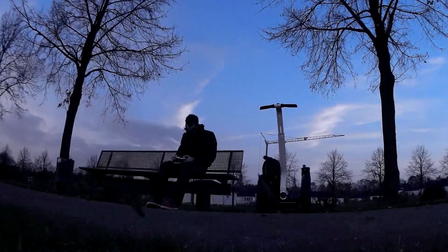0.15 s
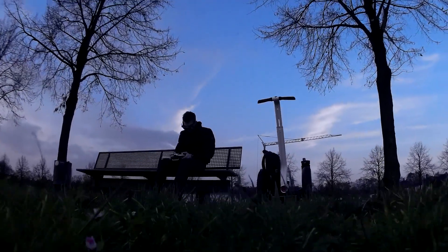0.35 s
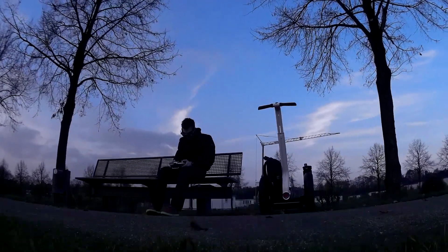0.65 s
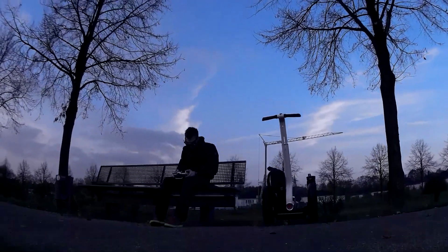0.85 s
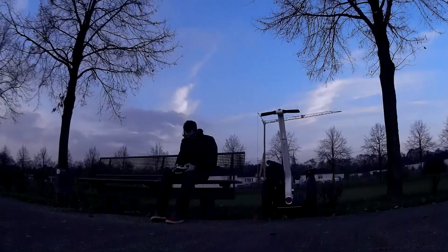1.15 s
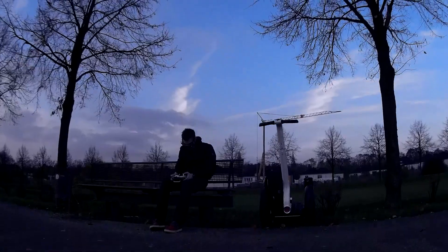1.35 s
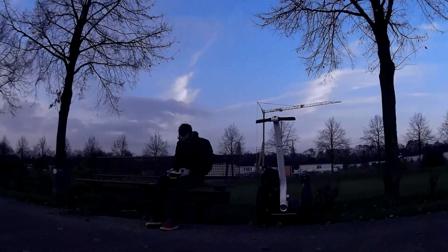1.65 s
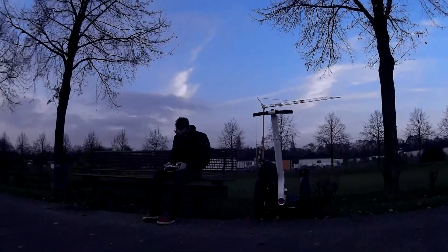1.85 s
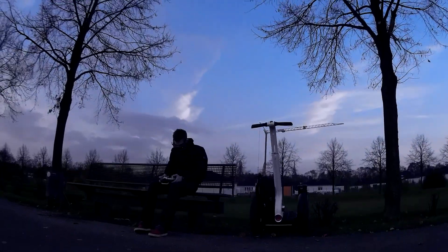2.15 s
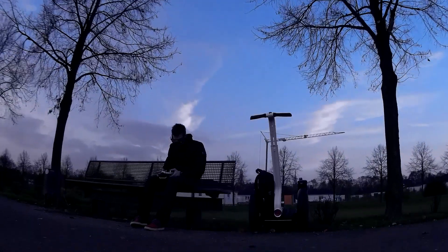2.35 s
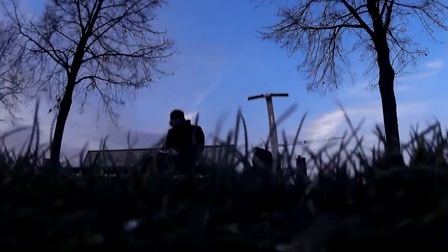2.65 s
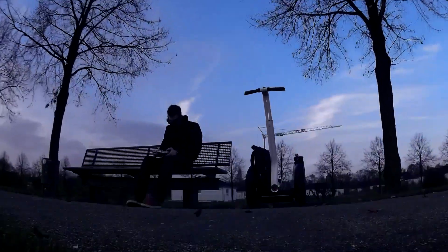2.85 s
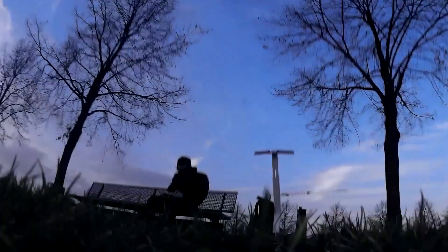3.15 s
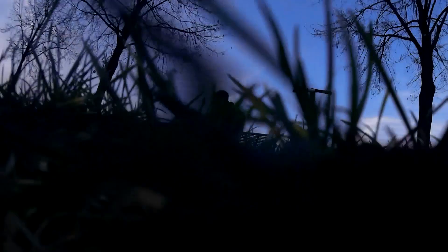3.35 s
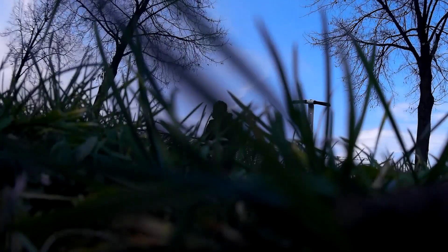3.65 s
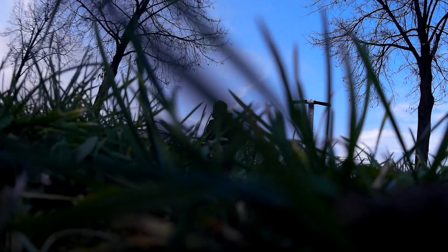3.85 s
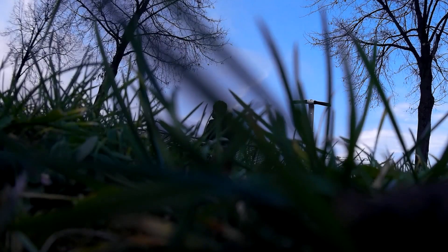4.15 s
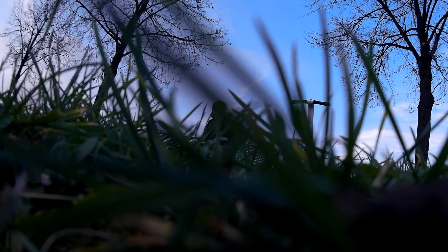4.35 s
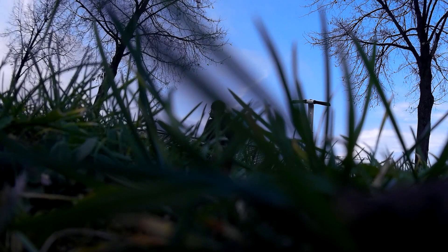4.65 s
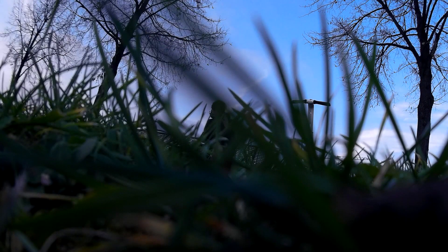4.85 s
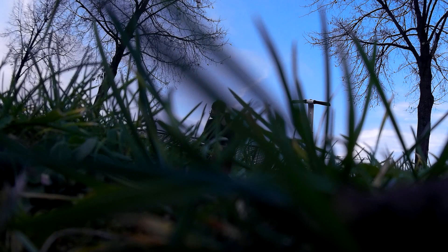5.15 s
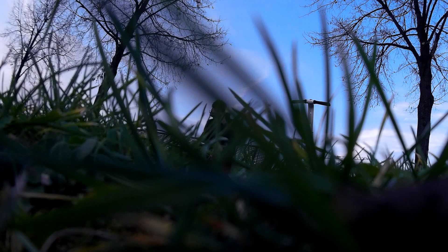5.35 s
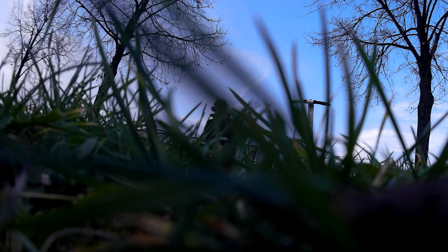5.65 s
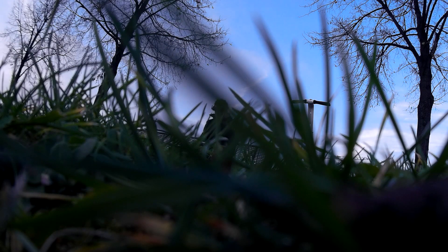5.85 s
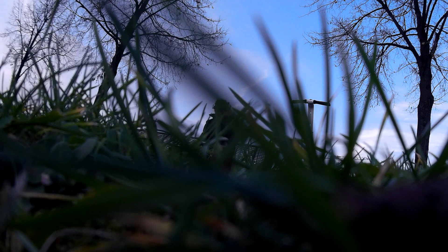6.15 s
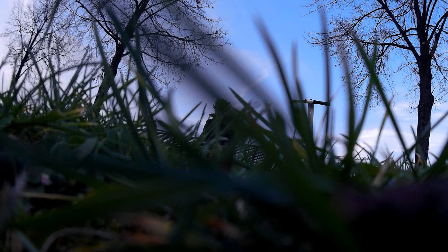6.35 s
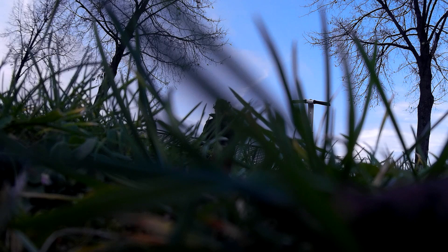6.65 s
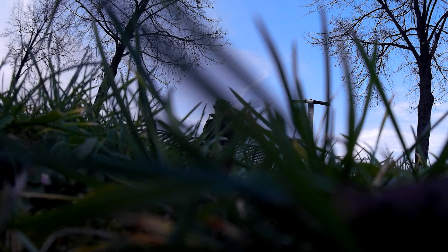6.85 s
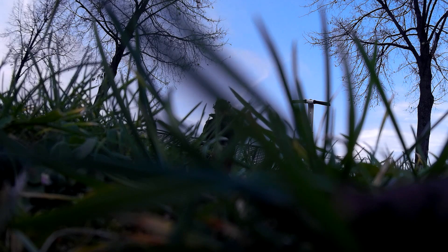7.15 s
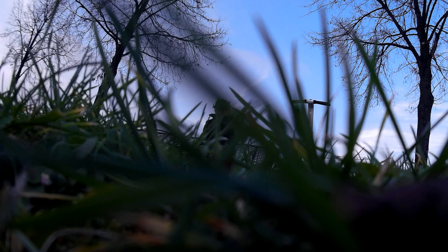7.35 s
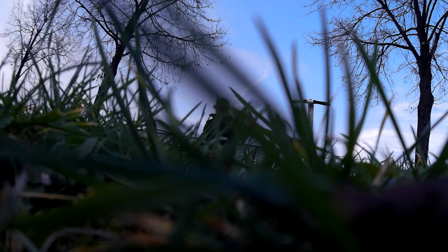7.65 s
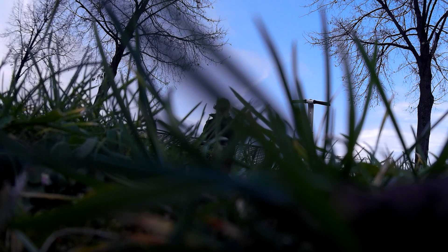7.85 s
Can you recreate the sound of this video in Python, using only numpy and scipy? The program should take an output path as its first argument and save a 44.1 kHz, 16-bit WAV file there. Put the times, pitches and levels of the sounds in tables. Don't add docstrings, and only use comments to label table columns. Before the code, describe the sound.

A small four-rotor drone is heard from a dull, enclosed microphone on its own body, outdoors in a park. From 0 to 2.7 seconds the propellers buzz very loudly, detuned mid-low tones beating and wavering in pitch, with roaring, hissing wash and low wind buffeting, strongest around 0.3 to 0.6. At about 2.7 it bumps the ground with a thud and gust, overloading; by 3.0 the rotors collapse in pitch and a thin whine glides down. At 3.2 it tumbles into grass with a hard gritty crunch. Until 4.3 idling blades slap stalks in rapid irregular cracks and woody knocks, with swishing and rattling. From 4.3 the last motor whine falls quickly, with sparse weak taps, stopping by 4.8. Then to 8 seconds only very faint far traffic rumble remains, with barely audible short electronic whines about once a second.

```python
import sys
import numpy as np
from scipy import signal
from scipy.fft import rfft, irfft, next_fast_len
from scipy.io import wavfile
from scipy.ndimage import uniform_filter1d, map_coordinates

SR = 44100
rng = np.random.default_rng(int(sys.argv[2]) if len(sys.argv) > 2 else 0)


def master_out(mix):
    frames = np.transpose(np.atleast_2d(mix))
    ceiling = np.clip(frames, -1, 1)
    pcm = np.round(ceiling * 32767).astype(np.int16)
    wavfile.write(sys.argv[1], SR, pcm)


def ratio(d):
    e = np.asarray(d, float) / 20
    return 10 ** e


N = 353241
T = np.arange(N) / SR

# (f/Hz, width/Hz, level/dB)
FRAME_MODES = [(906, 36, -1.5), (1140, 64, 0.5), (1372, 43, -1.5)]
# (f/Hz, width/Hz, level/dB)
SHELL_MODES = [(4450, 320, 8.5), (5800, 400, 3), (7900, 500, 6), (9900, 600, 8), (13900, 700, 5)]


def unit(x):
    return x / np.sqrt(np.mean(x ** 2) + 1e-20)


def along(points, f_hz):
    f, v = np.transpose(points)
    return np.interp(np.log(f_hz + 1), np.log(f + 1), v)


def curves(rows):
    t_s, *columns = np.transpose(rows)
    gate = np.interp(T, [t_s[0] - .012, t_s[0], t_s[-1], t_s[-1] + .012], [0, 1, 1, 0])
    return [gate] + [np.interp(T, t_s, c) for c in columns]


def wobble(rate_hz):
    return map_coordinates(rng.standard_normal(int(N * rate_hz / SR) + 4), [T * rate_hz])


def filtered(x, gain):
    m = next_fast_len(N + 8192)
    return irfft(rfft(x, m) * gain(np.fft.rfftfreq(m, 1 / SR)), m)[:N]


def humps(modes, f_hz):
    return sum(ratio(2 * db) / (1 + (2 * (f_hz - c) / w) ** 2) for c, w, db in modes)


def noise(spectrum, drive=1, modes=(), lift_db=0):
    def gain(f):
        return ratio(along(spectrum, f)) * np.sqrt(1 + ratio(2 * lift_db) * humps(modes, f))
    return unit(filtered(drive * rng.standard_normal(N), gain))


def phase(f_hz, jitter):
    return 2 * np.pi * np.cumsum(f_hz * (1 + jitter * wobble(40))) / SR + rng.uniform(0, 2 * np.pi)


def tone(rows, jitter, flutter_db):
    gate, f_hz, level_db = curves(rows)
    level = ratio(level_db + flutter_db * wobble(35).clip(None, .4))
    return np.sqrt(2) * gate * level * np.sin(phase(f_hz, jitter))


def rotor(rows, orders, weak, hunt=.002):
    # (f/Hz, width/Hz, level/dB)
    duct_modes = [(1210, 110, 10), (1740, 90, 4)]
    # (t/s, level/dB)
    guard_rows = [(0, 2), (.11, 2), (.17, -7), (.75, -7), (.88, 1), (.98, 2.5), (1.05, -2), (1.7, -3),
                  (1.95, -7), (2.04, 0), (2.6, 0), (2.68, -7)]
    gate, f_hz, *levels_db = curves(rows)
    f_hz = f_hz * (1 + hunt * wobble(14))
    turn = phase(f_hz, jitter=.004)
    guard = ratio(2 * curves(guard_rows)[1])
    tremble = .14 * wobble(110)
    lines = list(zip(orders, levels_db))
    lines += [(k, db + levels_db[0 if k < orders[-1] else -1]) for k, db in weak]
    blades = np.zeros(N)
    for k, db in lines:
        flutter_db = (1.3 * k - .6) * wobble(30).clip(None, 1)
        level = ratio(db + 1.2 * (k > 1.9) + flutter_db)
        ringing = np.sqrt(1 + guard * humps(duct_modes, k * f_hz))
        blades += level * ringing * np.sin(k * turn + k * k + (k - 1) * tremble)
    shaken = ratio((T > 2.72) * 3 * wobble(45).clip(None, .3))
    return np.sqrt(2) * gate * shaken * blades, turn


def flight():
    # (t/s, f/Hz, level/dB)
    near_rows = [(0, 446, -15), (.05, 446, -15), (.1, 457, -16.3), (.2, 470, -15), (.3, 490, -12.5),
                 (.38, 508, -12.4), (.45, 497, -12.5), (.52, 500, -12), (.6, 492, -12.5), (.66, 483, -12),
                 (.7, 494, -12.4), (.78, 478, -13), (.87, 470, -14), (.93, 459, -15.5), (.99, 493, -12.3),
                 (1.1, 490, -12), (1.3, 470, -13), (1.4, 452, -13.2), (1.55, 447, -13.2), (1.7, 447, -13.2),
                 (1.8, 436, -14.5), (1.87, 436, -15), (1.95, 445, -16), (2.04, 423, -16.3),
                 (2.1, 432, -16.5), (2.4, 427, -18), (2.6, 444, -15.8), (2.785, 443, -21), (2.83, 483, -9),
                 (2.87, 461, -28)]
    # (t/s, f/Hz, tone/dB, blade chop/dB)
    left_rows = [(0, 385, -22, -20), (.07, 392, -23, -21), (.12, 398, -15, -20), (.19, 410, -20, -20),
                 (.25, 430, -14, -24), (.32, 456, -12.5, -28), (.37, 466, -13, -27), (.45, 458, -12.5, -24),
                 (.55, 470, -12, -25), (.6, 455, -12, -26), (.66, 470, -11, -24), (.71, 458, -11.5, -27),
                 (.8, 448, -12.5, -21), (.88, 433, -14, -19), (.95, 422, -16, -19), (1.0, 447, -13, -27),
                 (1.03, 455, -11, -27), (1.1, 447, -9.6, -25), (1.15, 453, -10, -26),
                 (1.22, 442, -10.5, -25), (1.3, 437, -10.5, -27), (1.38, 424, -11.5, -30),
                 (1.46, 419, -11.6, -28), (1.53, 428, -12.5, -27), (1.7, 427, -13.5, -23),
                 (1.82, 417, -16, -21), (1.96, 427, -17, -21), (2.05, 406, -22, -21),
                 (2.14, 420, -24, -21.5), (2.3, 412, -26, -22), (2.45, 401, -23, -21),
                 (2.58, 412, -20, -23), (2.7, 416, -15.6, -29)]
    # (t/s, f/Hz, tone/dB, blade chop/dB)
    drop_rows = [(2.724, 410, -18, -30), (2.76, 410, -22, -30), (2.83, 425, -12, -33),
                 (2.885, 360, -19, -35), (2.925, 335, -14, -37), (2.953, 318, -27, -37),
                 (2.968, 305, -12, -38), (2.99, 265, -18, -40), (3.02, 205, -33, -50)]
    # (t/s, f/Hz, tone/dB)
    far_rows = [(0, 358, -22), (.15, 353, -26), (.45, 414, -23.5), (.75, 427, -23), (.9, 377, -26),
                (1.2, 397.5, -24.5), (1.35, 377, -26.6), (1.8, 368, -27), (2.1, 368, -27.4),
                (2.4, 359.5, -28), (2.55, 357, -24), (2.7, 378, -28)]
    # (t/s, f/Hz, shaft/dB, tone/dB)
    rear_rows = [(.7, 340, -56, -42), (1.3, 334, -47.5, -46), (1.5, 330.3, -34, -32.5),
                 (2.1, 329.8, -32.5, -41), (2.55, 330.4, -37.5, -26)]
    # (t/s, turbulence/dB)
    wash_rows = [(0, 1), (.1, 3.5), (.25, 9), (.59, 9), (.75, 3), (.95, 0), (1.1, 2), (1.75, -1),
                 (2.5, 1.5), (2.58, 6), (2.84, 5.5), (2.92, -3), (2.98, -4.5), (3.03, -20.5)]
    # (f/Hz, density/dB per Hz)
    roar_spectrum = [(76, -53), (130, -36), (211, -6.5), (268, -22.5), (323, -17.5), (429, -6),
                     (483, -11.5), (1270, -7.5), (1430, -14), (1680, -8.5), (3200, -31), (4160, -42),
                     (7040, -120)]
    # (f/Hz, density/dB per Hz)
    hiss_spectrum = [(1290, -50), (2200, -6.5), (3830, -1), (5170, -13.5), (5840, -16), (6820, -18.5),
                     (9760, -25), (15400, -36.5)]
    # (f/Hz, density/dB per Hz)
    buffet_spectrum = [(12, -26), (20, -2.5), (123, -5), (155, -2), (265, -12.5), (300, -8), (390, -40.5),
                       (660, -120)]
    # (f/Hz, width/Hz, level/dB)
    housing_modes = [(5825, 480, 6.5), (7750, 370, 2.5), (9750, 440, 11.5), (11900, 610, 11.5),
                     (13800, 820, 2)]

    half, odd = 1 / 2, 3 / 2
    near, near_turn = rotor(near_rows, orders=[1], weak=[(half, -19), (2, -15), (3, -22), (5, -29)])
    left_weak = [(half, -17), (3, -10), (4, -11.5), (5, -17), (6, -23)]
    left, left_turn = rotor(left_rows, orders=[1, 2], weak=left_weak, hunt=.005)
    drop, _ = rotor(drop_rows, orders=[1, 2], weak=[(half, -17), (3, -3), (4, -9)], hunt=.012)
    far, _ = rotor(far_rows, orders=[1], weak=[(half, -9), (odd, -3.5), (2, -4.5), (3, -13)])
    rear, _ = rotor(rear_rows, orders=[half, 1], weak=[])

    gate, stir_db = curves(wash_rows)
    power_cut_s, die_db_per_s2 = 2.842, 328
    roar_db = -10 + .08 * stir_db - .7 * T - die_db_per_s2 * np.clip(T - power_cut_s, 0, 1) ** 2
    slam_s, slam_width_s, slam_db = 2.736, .18, 15.5
    buffet_db = -38 + 1.71 * stir_db.clip(0) + slam_db * np.exp(-((T - slam_s) / slam_width_s) ** 2)
    puffs = 1 + .25 * np.cos(near_turn) + .3 * np.cos(left_turn)
    eddies = ratio(.71 * wobble(120) + .27 * wobble(25))
    roar = ratio(roar_db - 4.5) * noise(roar_spectrum, drive=ratio(.49 * wobble(60)))
    hiss = ratio(-33 + stir_db) * noise(hiss_spectrum, drive=puffs * eddies, modes=housing_modes, lift_db=3.5)
    buffet = ratio(buffet_db) * noise(buffet_spectrum, drive=ratio(.83 * wobble(14)))
    return ratio(.5) * (near + left + drop + far) + rear + gate * (roar + hiss + buffet)


def coasting():
    # (f/Hz, width/Hz, level/dB)
    panel_modes = [(1143, 60, 17), (984, 23, 20.5), (894, 23, 23.5), (815, 58, 18.5)]
    stop_s, coast_s, last_s, swell_s = 4.3, .38, .3, .07
    u_s = (T - stop_s).clip(0, coast_s)
    f_hz = 1530 - 3750 * u_s + 2000 * u_s ** 2
    swell = .3 + .7 * (u_s / swell_s).clip(0, 1)
    gap_hz, gap_width_hz = 1070, 32
    gap = 1 - np.exp(-((f_hz - gap_hz) / gap_width_hz) ** 2)
    gate = curves([(stop_s,), (stop_s + last_s,)])[0] * swell * gap
    panels = sum(ratio(db) / (1 + 2j * (f_hz - c) / w) for c, w, db in panel_modes)
    flutter_db = (1 + 5 * u_s) * wobble(45).clip(None, .3)
    level = ratio(-32.5 - 25.5 * u_s + flutter_db) * abs(1 + panels)
    return np.sqrt(2) * gate * level * np.sin(phase(f_hz, jitter=.011))


def motors():
    # (t/s, f/Hz, level/dB)
    cut_rows = [(3.015, 2330, -44), (3.03, 2190, -35), (3.045, 2040, -33), (3.065, 1940, -21),
                (3.1, 1870, -30), (3.108, 1850, -34), (3.117, 1820, -18), (3.13, 1800, -33),
                (3.14, 1770, -17), (3.165, 1725, -23), (3.19, 1700, -20)]
    # (t/s, f/Hz, level/dB)
    stop_rows = [(4.33, 960, -36), (4.37, 850, -25), (4.42, 790, -28), (4.47, 715, -31), (4.52, 620, -44)]
    # (start/s, end/s, from/Hz, to/Hz, level/dB)
    glides = [(2.89, 2.93, 840, 770, -22), (2.945, 2.98, 2120, 1880, -27), (2.97, 3.03, 1820, 1200, -28),
              (2.91, 2.99, 510, 460, -27), (2.9, 3.02, 175, 120, -25), (3.04, 3.085, 920, 720, -27),
              (2.99, 3.02, 2450, 2150, -33), (3.05, 3.09, 1200, 1000, -30), (3.04, 3.12, 1150, 930, -29),
              (2.74, 2.77, 325, 320, -17), (4.37, 4.43, 1050, 830, -28), (4.53, 4.6, 1000, 800, -33),
              (4.3, 4.36, 1150, 950, -29), (4.58, 4.63, 900, 1000, -34), (4.62, 4.72, 1000, 680, -36),
              (4.45, 4.53, 480, 400, -39), (4.13, 4.24, 1590, 1650, -24), (4.585, 4.62, 570, 500, -36),
              (4.625, 4.66, 480, 420, -33), (4.58, 4.72, 430, 330, -44), (4.4, 4.47, 900, 800, -31),
              (4.3, 4.36, 1500, 1360, -30)]
    # (t/s, f/Hz, level/dB)
    idle_rows = [(3.5, 1810, -35), (3.75, 1807, -33), (3.95, 1820, -36), (4.05, 1805, -27.5),
                 (4.12, 1844, -39), (4.2, 1816, -23), (4.27, 1810, -37)]
    # (t/s, f/Hz, level/dB)
    shaft_rows = [(3.05, 119.5, -39), (3.168, 105.5, -35), (3.9, 100, -33), (3.97, 100.7, -41),
                  (4.15, 98.7, -36), (4.29, 98, -48)]
    # (t/s, f/Hz, level/dB)
    arm_rows = [(4.42, 283.3, -50), (4.6, 278, -42), (4.76, 275, -45), (4.87, 278, -61)]
    whine = coasting() + tone(stop_rows, jitter=.015, flutter_db=6)
    whine += ratio(1) * tone(cut_rows, jitter=.008, flutter_db=2)
    for start_s, end_s, from_hz, to_hz, db in glides:
        middle = ((start_s + end_s) / 2, (from_hz + to_hz) / 2, db)
        rows = [(start_s, from_hz, db - 6), middle, (end_s, to_hz, db - 6)]
        whine += tone(rows, jitter=.012, flutter_db=3)
    whine += tone(idle_rows, jitter=.004, flutter_db=4)
    shaft = tone(shaft_rows, jitter=.003, flutter_db=1.5)
    return whine + shaft + tone(arm_rows, jitter=.02, flutter_db=5)


def bumps():
    # (t/s, level/dB, length/s, low push/dB, treble share/dB)
    contacts = [(2.695, -15, 0.015, -5, -2.5), (2.737, -9, .012, -6.5, 1), (2.749, -2, 0.011, -12, -2.5),
                (3.139, -22, 0.0053, -31.5, 4), (3.15, -19, 0.022, -31.5, 3.5), (3.17, -9, 0.011, -6.5, -2),
                (3.1795, -5.5, 0.0054, -12, 5.5), (3.186, -3, 0.021, -5, -3.5), (3.2065, 3.5, 0.01, -18, 2),
                (3.2185, -8, .012, -22.5, -9), (3.224, -25, 0.012, -6.5, -6), (3.405, -16, 0.018, -27, -8),
                (3.445, -24.5, 0.038, -36, -5)]
    # (f/Hz, density/dB per Hz)
    crunch_spectrum = [(88, -41), (150, -4.5), (359, -3.5), (461, -5), (841, -1.5), (1480, 0), (2090, -9.5),
                       (3400, -11), (3670, -14), (14000, -36), (15500, -52)]
    scrape, grit, push = np.zeros(N), np.zeros(N), np.zeros(N)
    for k, (s, db, length_s, push_db, share_db) in enumerate(contacts):
        u = (T - s) / length_s
        burst = ratio(db) * np.clip(4 * u + 1, 0, 1) * np.exp(-np.clip(u, 0, 9) ** 3)
        scrape += burst
        grit += ratio(share_db) * burst
        v = np.clip(u, 0, 2)
        push += (-1) ** k * ratio(push_db) * np.sin(2 * np.pi * v) * np.exp(-.9 * v)
    crunch = noise(crunch_spectrum, drive=ratio(2.5 * wobble(300)))
    grit_hz = 3000
    dull = filtered(crunch, lambda f: 1 / (1 + (f / grit_hz) ** 4))
    return push + scrape * dull + grit * (crunch - dull)


def slaps():
    # (t/s, peak/dB, treble share/dB)
    cuts = [(3.113, -32, -16), (3.136, -21, -17), (3.252, -31.5, -26), (3.2849, -31, -20),
            (3.312, -9.5, -23), (3.3474, -21, -23), (3.3898, -13, -22), (3.41, -11.5, -34),
            (3.4291, -14, -22), (3.4476, -19, -21), (3.4714, -27, -12), (3.4844, -28, -19),
            (3.4994, -32, -19), (3.5254, -33, -23), (3.5593, -23, -27), (3.5957, -19, -23),
            (3.6443, -12, -23), (3.6554, -14, -23), (3.6696, -14, -23), (3.7154, -26, -14),
            (3.7314, -26, -15), (3.7758, -27, -17), (3.7993, -23, -18), (3.8276, -16, -18),
            (3.8436, -25, -15), (3.875, -20, -13), (3.8824, -16, -21), (3.896, -15, -23),
            (3.911, -11.5, -29), (3.953, -19, -24), (3.9689, -12, -31), (3.994, -17.5, -19),
            (4.053, -18, -23), (4.0642, -11, -23), (4.0858, -10, -25), (4.1195, -23, -19),
            (4.153, -26, -31), (4.173, -9, -40), (4.188, -15, -26), (4.2317, -15, -19), (4.26, -13, -21),
            (4.268, -26, -17), (4.283, -25, -12), (4.3004, -30, -16), (4.3174, -33, -19),
            (4.3344, -36, -13), (4.3488, -22.5, -18), (4.373, -29, -14), (4.385, -31, -12),
            (4.4059, -34, -21), (4.4224, -35, -22), (4.4466, -40, -18), (4.4772, -31, -25),
            (4.4954, -40, -15), (4.546, -38, -9), (4.578, -33.5, -16), (4.611, -35, -11),
            (4.6547, -29, -17), (4.6653, -26.5, -21), (4.7034, -46, -15)]
    # (t/s, level/dB, f/Hz)
    taps = [(4.1205, -4.5, 2645), (4.285, -4.5, 1140), (4.405, -44, 4290), (4.405, -24, 1360),
            (4.425, -46, 4800), (4.449, -44, 4700), (4.477, -43, 4500), (4.498, -17, 1700),
            (4.544, -20, 1340), (4.579, -16, 1370), (4.584, -40, 4630), (4.614, -23, 2580),
            (4.653, -18, 1380), (4.665, -32, 3520), (4.704, -21.5, 1400), (4.704, -35, 2480),
            (4.408, -29, 1700), (4.476, -28, 1350), (4.497, -24, 1390), (4.665, -27, 1950)]
    # (t/s, peak/dB, f/Hz)
    knocks = [(3.336, -19, 1140), (3.375, -27, 1380), (3.411, -5, 1750), (3.44, -5, 1200),
              (3.461, -3, 1057), (3.565, -21, 1130), (3.626, -7, 1124), (3.663, -5, 1310),
              (3.768, -4, 1350), (3.83, -18, 1370), (3.849, -6.5, 880), (3.876, -7, 1290),
              (3.896, -4, 1230), (3.939, -7, 1150), (4.086, -5, 1070), (4.121, -4, 1350),
              (4.149, -12, 1140), (4.255, -7, 1166)]
    # (f/Hz, density/dB per Hz)
    stalk_spectrum = [(1500, -29.5), (2900, 9), (4500, -2.5), (6500, -4.5), (8000, -12.5), (10000, -17),
                      (12000, -20.5), (14000, -25.5), (15300, -46.5), (15600, -120)]
    crack, treble, knock, ring = np.zeros((4, N))
    t = T[:2200]
    snap = 1 - np.exp(-(t / .0012) ** 2)
    rise = 1 - np.exp(-(t / .0015) ** 2)
    treble_hz, usual_share_db = 6500, -21
    for (s, db, share_db), grit in zip(cuts, rng.standard_normal((len(cuts), len(t)))):
        i = round(s * SR)
        burst = ratio(db - 60 * t / .0105) * snap * grit
        crack[i:][:len(t)] += burst
        treble[i:][:len(t)] += ratio(share_db - usual_share_db) * burst
        knock[i:][:len(t)] += ratio(db - 60 * t / .03) * rise * grit[::-1]
    for s, db, f_hz in taps + knocks:
        t60_s = 20 / f_hz + .025
        ring[round(s * SR):][:len(t)] += ratio(db - 60 * t / t60_s) * rise * np.sin(2 * np.pi * f_hz * t)

    def colour(f):
        return ratio(along(stalk_spectrum, f)) * np.sqrt(1 + humps(SHELL_MODES, f))

    def low(f):
        return 1 / (1 + (f / treble_hz) ** 8)

    bright = filtered(crack, lambda f: colour(f) * low(f))
    bright += filtered(treble, lambda f: colour(f) * (1 - low(f)))
    thud = filtered(knock, lambda f: np.sqrt(humps(FRAME_MODES, f)))
    return ratio(7.0) * bright + ratio(-5.0) * thud + ratio(-1.5) * ring


def idle():
    # (t/s, shaking/dB)
    spells = [
        [(2.98, -21.5), (3.106, -27.5), (3.165, -16)],
        [(3.235, -13.5), (3.28, -24), (3.33, -17.5), (3.45, -19), (3.9, -17), (4.28, -19), (4.31, -24.5),
         (4.54, -30), (4.7, -35.5), (4.8, -63)],
    ]
    # (f/Hz, density/dB per Hz)
    body_spectrum = [(24, -57.5), (40, -18), (96, -13.5), (130, -14.5), (287, -8.5), (642, -9.5),
                     (1130, -7), (1760, -6), (2170, -20), (2400, -17), (3120, -42), (5280, -120)]
    # (f/Hz, density/dB per Hz)
    swish_spectrum = [(1500, -34.5), (2200, -35.5), (3200, -14), (4500, -17), (6500, -26.5), (8000, -31),
                      (10000, -34), (14000, -48), (15200, -63), (15500, -120)]
    turn = phase(81 + 6 * (T > 3.9) + wobble(1.8), jitter=.026)
    frame = noise(body_spectrum, drive=ratio(1.7 * wobble(45)), modes=FRAME_MODES, lift_db=10)
    knocks = (2.8 + np.cos(turn)) ** 2 * ratio(1.2 * wobble(30))
    rattle = unit(filtered(knocks * rng.standard_normal(N), lambda f: humps([(2655, 180, 0)], f)))
    brush = ratio(2.9 * wobble(230)) * (3 + np.cos(2 * turn))
    swish = noise(swish_spectrum, drive=brush, modes=SHELL_MODES, lift_db=0)
    in_grass_s, loose_s, tight_s = 3.137, 3.43, 4.32
    loose = uniform_filter1d(1. * (T > loose_s) * (T < tight_s), size=2500)
    airborne = T < in_grass_s
    rattle_cut_db = -10 * (airborne + ((T - tight_s) / .45).clip(0, 1))
    swish_cut_db = -10 * (1.2 * airborne + ((T - tight_s) / .074).clip(0, 1))
    out = np.zeros(N)
    for rows in spells:
        gate, shake_db = curves(rows)
        swing_db = shake_db + 17
        rattle_db = -38 + .9 * swing_db + 10 * loose + rattle_cut_db
        swish_db = -40 + .94 * swing_db.clip(-14) + swish_cut_db + 1.3 * (swing_db + 18).clip(None, 0)
        out += gate * (ratio(shake_db) * frame + ratio(rattle_db) * rattle + ratio(swish_db + 6) * swish)
    return out


def drag():
    # (t/s, level/dB)
    spells = [
        [(2.97, -37), (3.05, -42), (3.13, -43)],
        [(4.36, -52), (4.46, -52), (4.6, -56), (4.7, -62)],
    ]
    # (f/Hz, density/dB per Hz)
    draught_spectrum = [(1800, -40), (2500, 0), (3300, 2), (4300, -11), (6200, -16), (7500, -32),
                        (10000, -60.5)]
    draught = noise(draught_spectrum, drive=ratio(3.6 * wobble(65)))
    return sum(gate * ratio(db) for gate, db in map(curves, spells)) * draught


def background():
    # (f/Hz, density/dB per Hz)
    traffic_spectrum = [(12, -38), (20, -6), (49, 1), (103, -2.5), (161, -7.5), (238, -7.5), (266, -11.5),
                        (414, -15.5), (1040, -5.5), (1530, -12), (2260, -38.5), (5820, -38.5),
                        (6680, -40.5), (8350, -38.5), (15400, -43.5)]
    # (start/s, end/s, level/dB, unsteadiness/0-1)
    whines = [(4.596, 4.787, -64, 1), (5.6, 5.93, -68.5, 1), (6.603, 6.75, -75, 0), (6.75, 6.813, -68, 1),
              (7.6, 7.82, -70.5, 1)]
    # (multiple of switching rate, level/dB)
    coil_orders = [(2, 0.5), (3, 3), (4, -2), (5, -8)]
    # (f/Hz, width/Hz, level/dB)
    ragged_modes = [(5800, 810, -4), (8000, 800, -2), (11200, 900, -5.5)]
    out = ratio(-46.5 + .23 * wobble(5.4) + .55 * wobble(10)) * noise(traffic_spectrum)
    coil_hz = 2823
    clean = sum(ratio(db) * np.sin(2 * np.pi * k * coil_hz * T) for k, db in coil_orders)
    crackle = ratio(1.7 * wobble(60)) * rng.standard_normal(N)
    ragged = unit(filtered(crackle, lambda f: humps(ragged_modes, f)))
    out += ratio(-88.5 + 3 * wobble(20)) * np.sin(phase(np.full(N, 8030), jitter=.002))
    for start_s, end_s, db, unsteady in whines:
        on = np.interp(T, [start_s - .015, start_s, end_s, end_s + .015], [0, 1, 1, 0])
        out += on * ratio(db) * (ragged if unsteady > .5 else clean)
    return out


def scene():
    return (flight() + motors() + bumps() + slaps() + idle() + drag() + background())[None]


def roll_off(x):
    return signal.sosfilt(signal.butter(12, 15540, fs=SR, output="sos"), x)


def record(dry):
    clipped = dry / (1 + np.abs(dry) ** 30) ** (1 / 30)
    return roll_off(clipped)


dry = scene()
out = record(dry)
master_out(out)
```